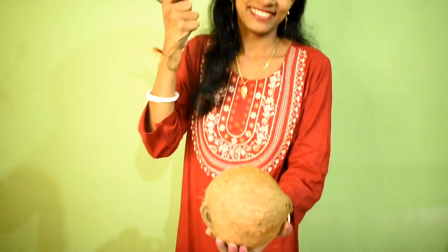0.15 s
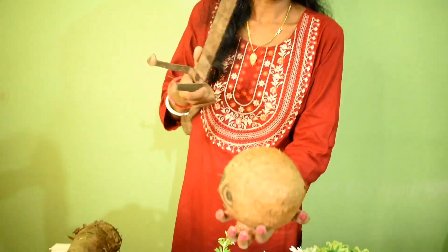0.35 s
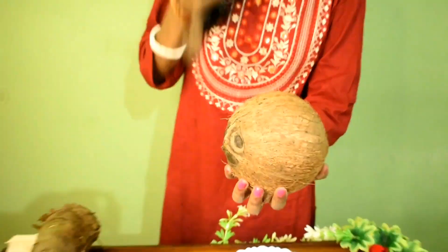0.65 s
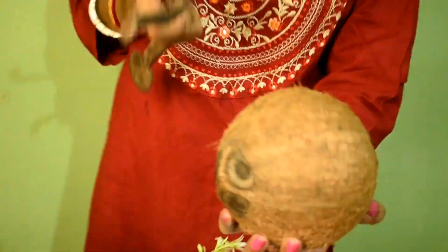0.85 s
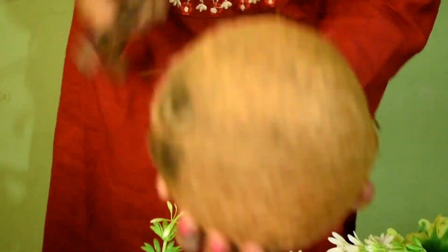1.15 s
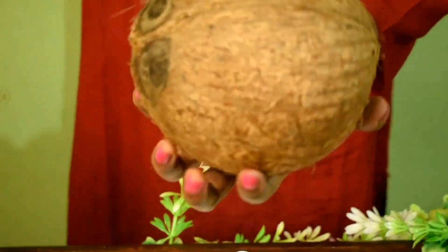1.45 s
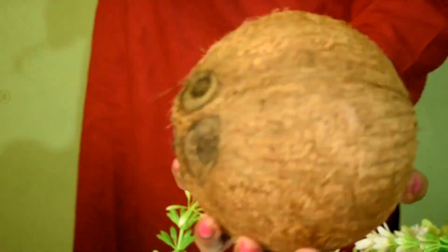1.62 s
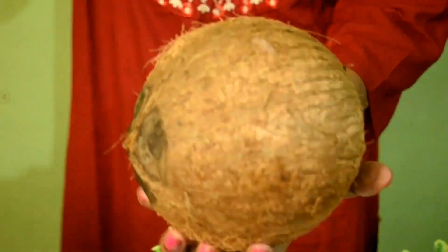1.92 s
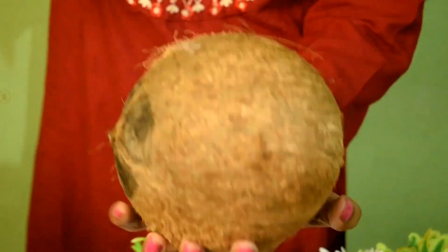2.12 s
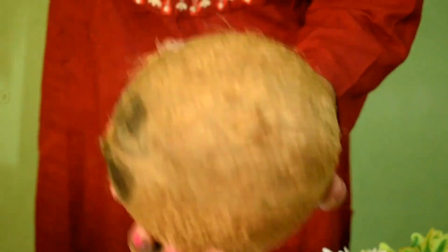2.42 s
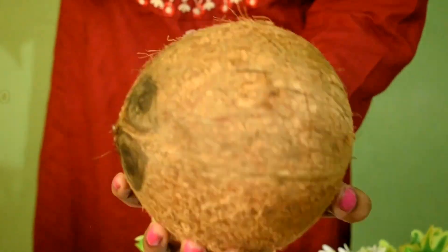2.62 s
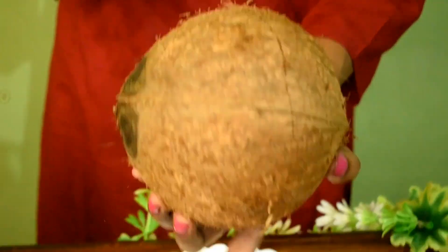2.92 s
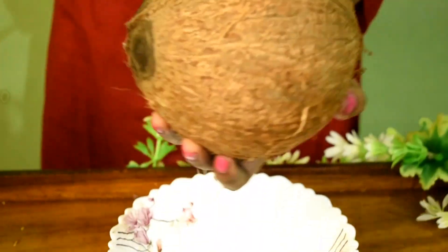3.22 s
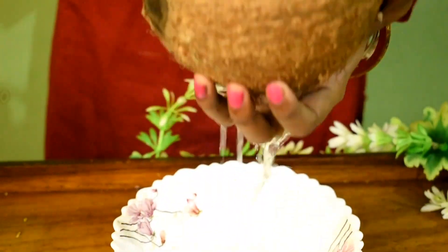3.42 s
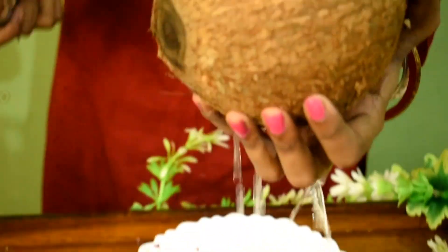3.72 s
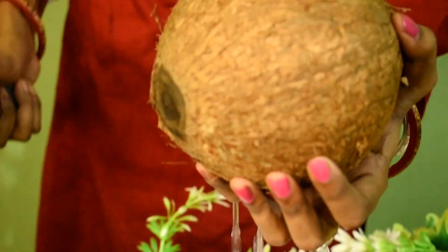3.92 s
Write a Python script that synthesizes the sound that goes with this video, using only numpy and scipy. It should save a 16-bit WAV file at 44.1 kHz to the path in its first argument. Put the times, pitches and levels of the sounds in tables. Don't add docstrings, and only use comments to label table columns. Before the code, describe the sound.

The echo of an earlier blow is still dying as a loose metal clink begins. Six loud, short, hollow knocks follow in even rhythm, each with a slapping, hard room echo squashed by a limiter, and a clink before each one. After the final sharp crack comes near quiet with a far motor hum, a soft rub and touch, then high watery ticks and bubbly drops thickening at the end, close to the microphone.

```python
import sys
import numpy as np
from scipy import signal
from scipy.io import wavfile

SR = 44100
rng = np.random.default_rng(int(sys.argv[2]) if len(sys.argv) > 2 else 0)


def ratio(d):
    e = np.asarray(d, float) / 20
    return 10 ** e


def inscribe(sig):
    pcm = np.round(np.clip(np.atleast_2d(sig).T, -1, 1) * 32767)
    wavfile.write(sys.argv[1], SR, pcm.astype(np.int16))


N = 178716
LEAD = SR // 5
RING_HZ = 3130


# start in seconds, peak in dB before the limiter,
# brightness in dB per octave, hollow ring in dB, blade ring in Hz.
BLOWS = [
    (-.1, 15.5, 0.86, -21, 3900),
    (0.3494, 19.5, 1, -22, 4000),
    (.805, 19, 0.67, -23, 6240),
    (1.2521, 21, 0.96, -26, 5270),
    (1.685, 19.5, 0.87, -24, 4690),
    (2.13, 18.5, 0.26, -19, 5570),
    (2.552, 26, 1.6, -16.5, 3540),
]


def blows(track):
    blade_share_db, blade_q = -4, 9.7
    forces = contacts(count=len(BLOWS), ragged_db=-31, t60=0.016)
    for (s, db, tilt_db, hollow_db, blade_hz), force in zip(BLOWS, forces):
        shell = ratio(db) * struck_shell(force, tilt_db)
        blade = signal.lfilter(*signal.iirpeak(blade_hz, blade_q, SR), shell)
        hollow = ring(623, db + hollow_db, 0.011) - ring(387, db + hollow_db - 6.5, 0.0073)
        add(track, s, shell + ratio(blade_share_db) * blade)
        add(track, s, hollow)


# mode in Hz, level at resonance in dB, t60 in seconds.
SHELL_MODES = [(460, -13.5, 0.025), (835, 0, 0.025), (1033, -3, 0.01), (1598, -3, 0.0045),
               (2326, -3, 0.007), (2944, -2.5, 0.0056), (4280, -3.5, 0.0029), (5700, -4, 0.0019),
               (6970, -8.5, 0.00098), (9280, -13, 0.00087), (12740, -20.5, 0.0005), (15200, -19, 0.0082)]


def struck_shell(force, tilt_db):
    modes = 0
    for k, (hz, db, t60) in enumerate(SHELL_MODES):
        drive = (-1) ** k / max(t60, 0.001)
        modes = modes + drive * ring(hz, db + tilt_db * np.log2(hz / 1000), t60)
    sound = signal.fftconvolve(force, modes)
    return sound / np.abs(sound).max()


def contacts(count, ragged_db, t60):
    return signal.unit_impulse(SR // 20) + ratio(ragged_db) * bursts(count, t60)


def bursts(count, t60):
    t = np.arange(SR // 20) / SR
    return rng.standard_normal((count, SR // 20)) * ratio(-60 * t / t60)


# start in seconds, peak in dB, ring t60 in seconds,
# twin mode in dB, knock share in dB.
CLINKS = [
    (.125, 7, 0.006, -6.5, -5.5),
    (0.5974, -9.5, 0.011, 4, 3),
    (1.0357, 7, 0.007, -5.5, -3),
    (1.4741, 0.5, 0.012, -5.5, -3),
    (1.9146, 0, 0.027, -7, -1),
    (2.337, 2, 0.017, 8, 3),
]
# mode in Hz, level in dB, t60 in seconds.
LOOSE_RING = [(2573, -4.5, 0.0046), (3360, -4, 0.013), (4500, -24, 0.0022), (4470, -6.5, 0.017),
              (4990, -13.5, 0.024), (5426, -13, 0.018)]


def clinks(track):
    twin_hz, twin_t60 = 3570, 0.007
    build = 1 - np.exp(-np.arange(SR // 4) / SR / 0.0005)
    others = sum(ring(*mode) for mode in LOOSE_RING)
    forces = contacts(count=len(CLINKS), ragged_db=-14, t60=0.004)
    for (s, db, t60, twin_db, knock_db), force in zip(CLINKS, forces):
        twin = ring(twin_hz, twin_db, twin_t60)
        overtone = ring(1.194 * twin_hz, twin_db - 10, twin_t60)
        add(track, s, ratio(db) * build * (others - ring(RING_HZ, 0, t60) - twin + overtone))
        knock = struck_shell(butter(force, 2, 9000, "low"), tilt_db=-0.17)
        add(track, s, ratio(db + knock_db) * knock)


def glance(track):
    s, db = 0.5985, -3
    add(track, s, ring(2370, db, 0.009) + ring(RING_HZ, db - 26, 0.012))


# start in seconds, peak in dB.
KNOCKS = [
    (3.02, -4),
]


def knocks(track):
    for s, db in KNOCKS:
        add(track, s, ring(673, db - 21.5, 0.014) + ring(370, db - 27, 0.017) + ring(4100, db - 16, 0.0021))


# start in seconds, level in dB, pitch in Hz, t60 in seconds.
BANGLES = [
    (3.63, -60, 11700, .08),
    (3.98, -44, 11200, .02),
]


def bangles(track):
    for s, db, hz, t60 in BANGLES:
        add(track, s, ring(hz, db, t60))


# time of the peak in seconds, peak in dB.
RUSTLE = [
    (2.96, -46.5),
    (3.016, -47),
    (3.619, -52.5),
    (3.77, -58),
]


def rustle(track):
    swell_db_per_s, fade_db_per_s = 140.5, 196
    t = np.arange(N) / SR
    level = 0
    for s, db in RUSTLE:
        level = level + ratio(db + np.minimum(swell_db_per_s * (t - s), fade_db_per_s * (s - t)))
    hiss = butter(rng.standard_normal(N), 1, [1500, 14000], "band")
    add(track, 0, hiss * level * ratio(1.5 * drift(60)))


# start in seconds, peak in dB, lowest frequency in Hz.
TICKS = [(3.298, -44, 4000), (3.472, -42, 5000), (3.687, -34, 12500), (3.72, -38, 9500),
         (3.737, -39, 11000), (3.75, -40, 11500), (3.778, -43, 10000), (3.804, -28, 6000),
         (3.946, -27, 7000), (3.9785, -21, 10500), (3.997, -26, 9000), (4.037, -31, 4000)]


def ticks(track):
    for (s, db, low_hz), burst in zip(TICKS, bursts(count=len(TICKS), t60=0.015)):
        add(track, s, ratio(db) * butter(burst, 2, low_hz, "high"))


# start in seconds, peak in dB, bubble pitch in Hz,
# pitch rise in octaves, splat in dB.
DROPS = [(3.472, -25.5, 10500, .1, -8), (3.7705, -30, 3000, .3, -5), (3.8086, -23, 6700, .8, -1),
         (3.813, -24, 6800, 0.55, 1), (3.8246, -27, 5700, .7, -5), (3.8638, -9, 5130, 0.25, -5.5),
         (3.877, -13, 4400, 0.27, -1), (3.903, -10.5, 3050, 1, -8), (3.921, -27, 5140, 0.27, 12),
         (3.946, -16, 2780, .3, 10.5), (3.9536, -19, 3300, .4, 10), (4.006, 0, 4230, 1.6, -1),
         (4.0118, -5, 5850, 1.06, -7), (4.0364, -25, 3760, .4, -2)]


def drops(track):
    bubble_t60, rise_s = 0.016, 0.0035
    t = np.arange(SR // 20) / SR
    onset = 1 - np.exp(-t / 0.0008)
    for (s, db, hz, rise, splat_db), burst in zip(DROPS, bursts(count=len(DROPS), t60=0.026)):
        pitch = hz * 2 ** (rise * (np.tanh(t / rise_s) - 0.4))
        bubble = np.sin(2 * np.pi * np.cumsum(pitch) / SR) * ratio(-60 * t / bubble_t60)
        splat = butter(burst, 2, [hz * 0.63, min(hz * 1.63, 19000)], "band")
        add(track, s, ratio(db - 7) * (bubble + ratio(splat_db) * splat) * onset)


def spray():
    end_db, swell_db_per_s, drops_per_s, pitches = -48, 69, 1200, 14
    sizes = ratio(3.2 * np.minimum(rng.exponential(1, N), 4)) * (rng.random(N) < drops_per_s / SR)
    dealt = rng.integers(0, pitches, N)
    out = 0
    for k, hz in enumerate(np.geomspace(4500, 15500, pitches)):
        r = ratio(-60 * hz / 2.1 / SR)
        w = 2 * np.pi * hz / SR
        hits = sizes * (dealt == k) + 1e-18
        out = out + signal.lfilter([0, np.sin(w)], [1, -2 * r * np.cos(w), r * r], hits)
    seconds_left = np.arange(N, 0, -1) / SR
    return np.pad(rms_one(out) * ratio(end_db + 13 - swell_db_per_s * seconds_left), (LEAD, 0))


# frequency in Hz, t60 in seconds.
ROOM_T60 = [(200, 0.45), (500, 0.49), (1400, 0.4), (3700, 0.39), (9700, 0.32), (15000, 0.29)]
# frequency in Hz, level in dB.
ROOM_LINES = [(424.7, -0.5), (669.6, 2), (802, 0), (960, 3), (1044, -4), (1557, -3.5), (1668, -5),
              (1851, -18.5), (2162, -12), (2275, -2)]
# delay in seconds, level in dB over the diffuse echo.
SLAPS = [
    (0.027, 2.77),
    (0.05, 3.15),
]


def echoes():
    slap_s = 0.0041
    t = np.arange(SR) / SR
    diffuse = sum(pair * ratio(-60 * t / at_hz(ROOM_T60, hz)) for hz, pair in bands(SR))
    lines = 0
    for hz, db in ROOM_LINES:
        lines = lines + ratio(db - 60 * t / at_hz(ROOM_T60, hz) / 0.96) * np.sin(2 * np.pi * hz * t)
    slaps_db = sum(db * np.exp(-((t - s) / slap_s) ** 2) for s, db in SLAPS)
    dip = 1 - 0.34 * np.exp(-((t - 0.012) / 0.0033) ** 2)
    echo = (diffuse + ratio(-21.5) * lines) * ratio(slaps_db) * dip * (t > 0.0025)
    return echo / np.sqrt(np.sum(echo ** 2) / 2)


def room(far, near, echo):
    far_wet_db, near_wet_db = 4.5, -5.0
    sent = ratio(far_wet_db) * far + ratio(near_wet_db) * near
    wet = signal.fftconvolve(sent[None], echo, axes=1)[:, :len(far)]
    heard = near + butter(far, 2, 8000, "low")
    late = 0.2
    direct = np.array([ratio(-0.5) * heard, signal.lfilter([1 - late, late], [1], heard)])
    return butter(direct + wet, 3, 260, "high")[:, LEAD:]


# order as a multiple of the turning rate, level in dB rms.
DRONE = [(9, -52), (10, -44.5), (11, -52.5), (12, -51), (16, -54), (18, -47.5), (18.5, -50), (19, -45),
         (20, -41), (21, -60.5), (24, -55.5), (28, -49.5), (30.5, -59), (31.5, -43), (32, -63), (36.5, -52),
         (44.5, -70), (49.5, -61), (67.5, -54)]
# frequency in Hz, level in dB rms.
WHINE = [(1857, -69), (3359, -70), (3768, -117), (5787, -70)]


def motor():
    turning_hz = 22.15
    spread = 1.5
    turn = 2 * np.pi * turning_hz * np.cumsum(1 + 0.00294 * drift(1.39)) / SR
    tones = 0
    for k, db in DRONE:
        tones = tones + ratio(db - 4 + 1.1 * drift(5.4)) * np.sin(k * turn + spread * k * k)
    for hz, db in WHINE:
        tones = tones + ratio(db + 1.5 + 2.0 * drift(4)) * np.sin(turn * hz / turning_hz)
    return tones


# frequency in Hz, level in dB.
AIR = [(40, -12), (160, -23.5), (230, -12), (680, -8), (950, -16), (1770, -24), (3880, -33), (15500, -46)]
# frequency in Hz, width in Hz.
ROOM_NULLS = [(325, 63), (490, 32)]


def air_noise():
    air = sum(pair * ratio(at_hz(AIR, hz)) for hz, pair in bands(N))
    air = butter(air, 2, 110, "high")
    for hz, width in ROOM_NULLS:
        air = signal.lfilter(*signal.iirnotch(hz, hz / width, SR), air)
    return ratio(-42.5) * rms_one(air) * ratio(1.5 * drift(41))


# frequency in Hz, side minus mid in dB.
SIDE_DB = [(60, -21), (150, -10), (380, -28.5), (950, -27), (2380, -20.5), (5980, -12), (15000, -7.5)]


def bands(length):
    edges = 30 * 2 ** (np.arange(28) / 3)
    white = rng.standard_normal((2, 2, length))
    for k, (low, high) in enumerate(zip(edges, edges[1:])):
        mid, side = butter(white[k % 2], 2, [low, high], "band")
        hz = np.sqrt(low * high)
        yield hz, mid + ratio(at_hz(SIDE_DB, hz)) * side * [[1], [-1]]


def at_hz(points, hz):
    table_hz, values = np.transpose(points)
    return np.interp(np.log(hz), np.log(table_hz), values)


def butter(x, order, hz, kind):
    return signal.sosfilt(signal.butter(order, hz, kind, fs=SR, output="sos"), x)


def rms_one(x):
    return x / np.sqrt(np.mean(x ** 2) + 1e-20)


def ring(hz, db, t60):
    t = np.arange(SR // 4) / SR
    return ratio(db - 60 * t / max(t60, 0.001)) * np.sin(2 * np.pi * min(hz, 20000) * t)


def drift(rate_hz):
    r = np.exp(-2 * np.pi * rate_hz / SR)
    return rms_one(signal.lfilter([1], [1, -2 * r, r * r], rng.standard_normal(N + SR))[SR:])


def add(track, s, sound):
    at = LEAD + round(s * SR)
    track[at:at + len(sound)] += sound[:len(track) - at]


def scene():
    echo = echoes()
    background = motor() + air_noise()
    far, near = np.zeros(N + LEAD), spray()
    for source in (blows, clinks, knocks, bangles, rustle):
        source(far)
    for source in (ticks, drops, glance):
        source(near)
    return room(far, near, echo) + background


def band_limit(x):
    return signal.sosfilt(signal.butter(12, 15400, fs=SR, output="sos"), x)


def record(dry):
    ceiling_db, release_db_per_s, attack_s = -9.5, 300, 0.002
    start_db = 2.5
    level = signal.lfilter([0.08], [1, -0.92], np.abs(dry).max(axis=0))
    over = np.maximum(20 * np.log10(level + 1e-9) - ceiling_db, 0)
    over[0] = start_db
    slope = release_db_per_s * np.arange(N) / SR
    held = np.maximum.accumulate(over + slope) - slope
    r = np.exp(-1 / (attack_s * SR))
    reduction_db = signal.lfilter([1 - r], [1, -r], held, zi=[r * start_db])[0]
    limited = dry * ratio(-reduction_db) * ratio([[-0.3], [0]])
    clipped = np.clip(1.662 * np.tanh(limited / 1.431), -1, 1)
    smooth = butter(butter(clipped, 4, 16500, "low"), 1, 70, "high")
    return band_limit(np.clip(smooth, -1, 1))


dry = scene()
out = record(dry)
inscribe(out)
```